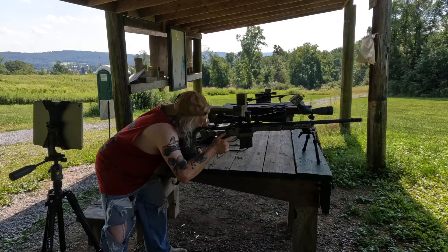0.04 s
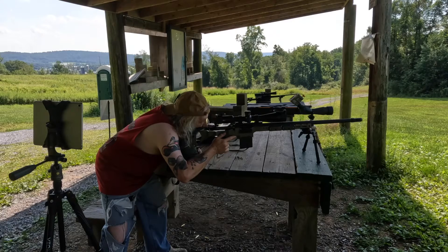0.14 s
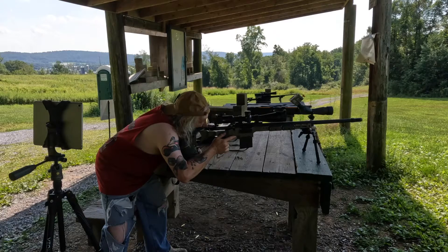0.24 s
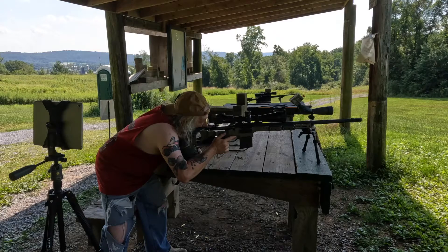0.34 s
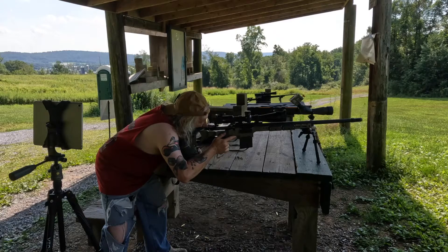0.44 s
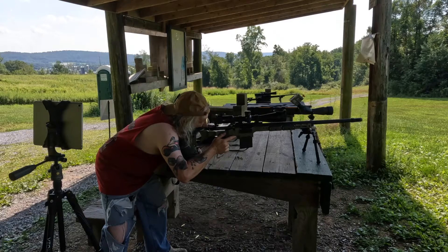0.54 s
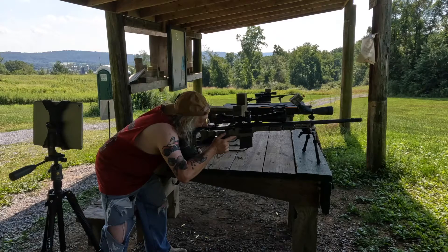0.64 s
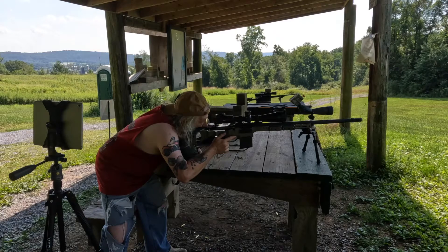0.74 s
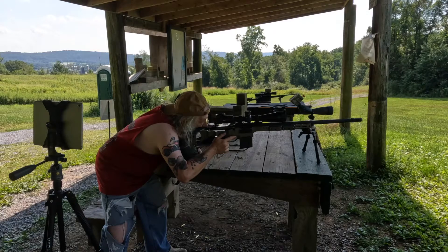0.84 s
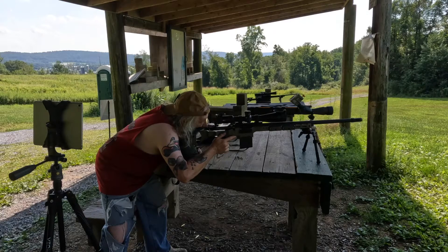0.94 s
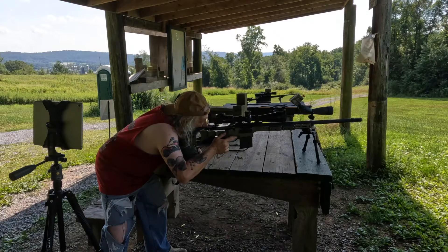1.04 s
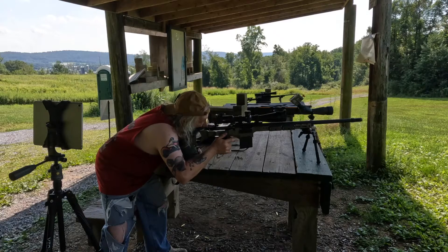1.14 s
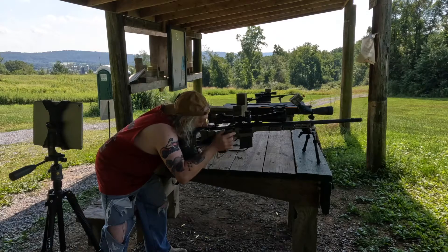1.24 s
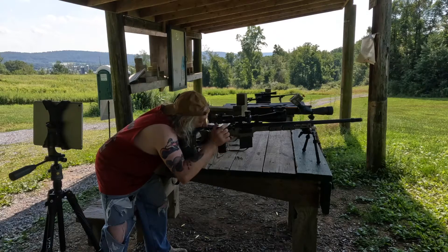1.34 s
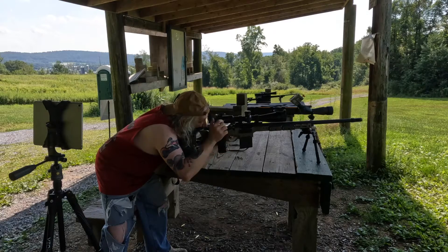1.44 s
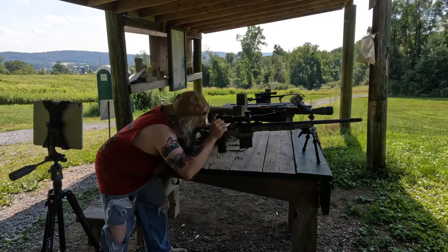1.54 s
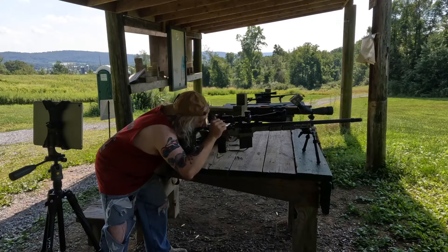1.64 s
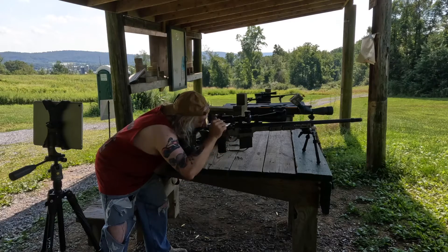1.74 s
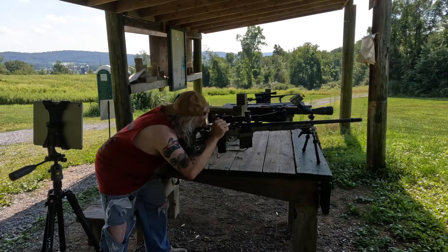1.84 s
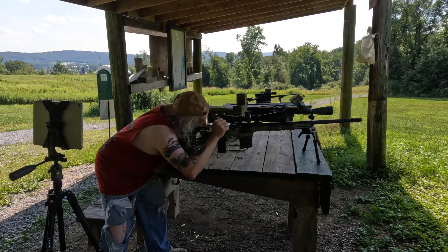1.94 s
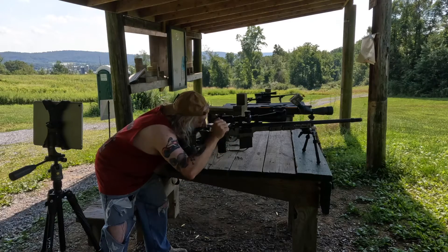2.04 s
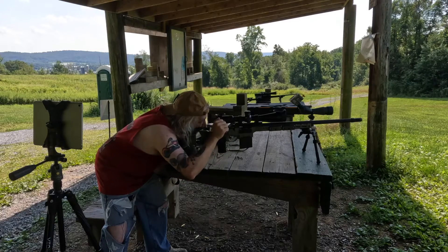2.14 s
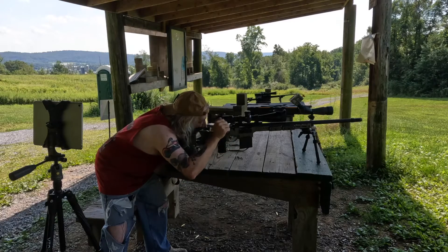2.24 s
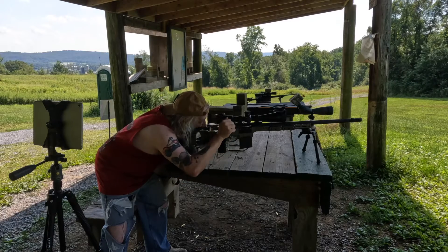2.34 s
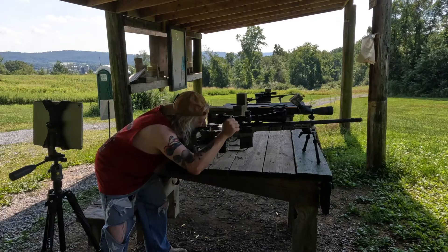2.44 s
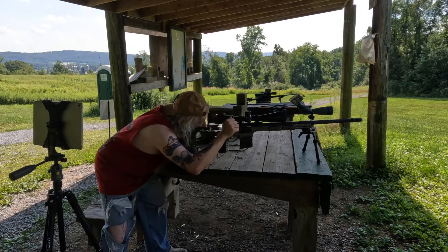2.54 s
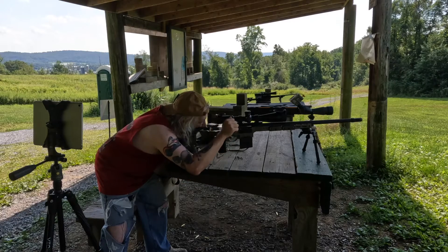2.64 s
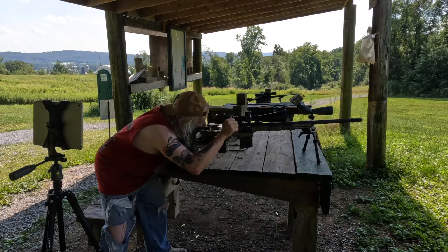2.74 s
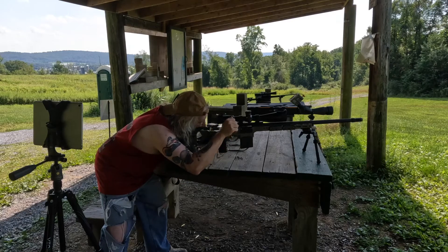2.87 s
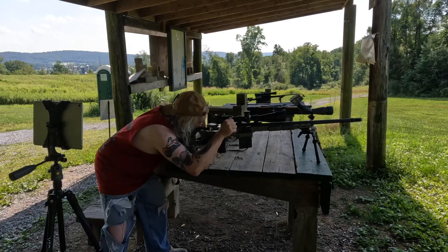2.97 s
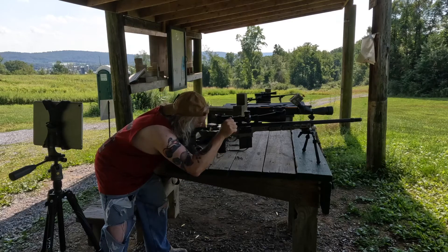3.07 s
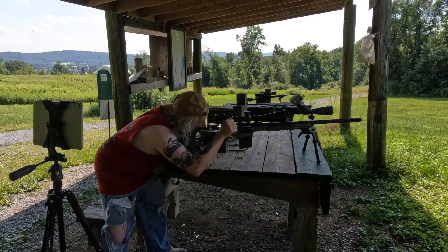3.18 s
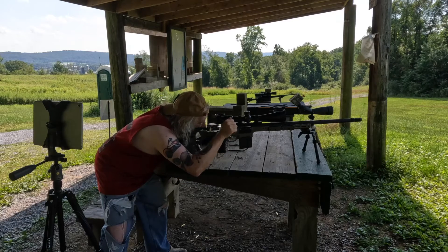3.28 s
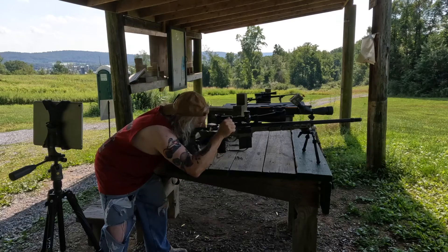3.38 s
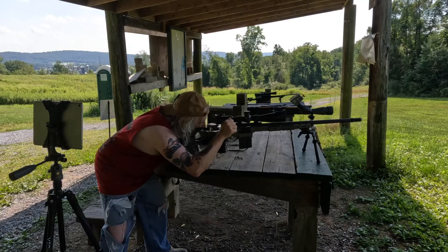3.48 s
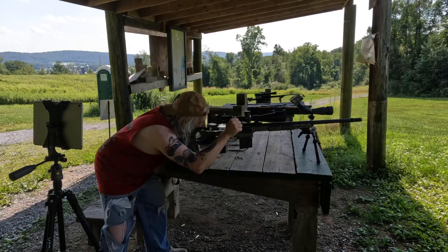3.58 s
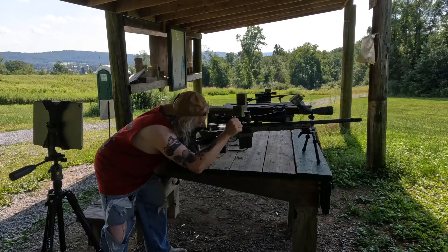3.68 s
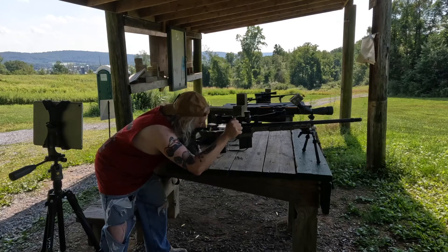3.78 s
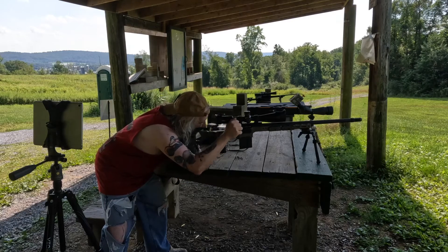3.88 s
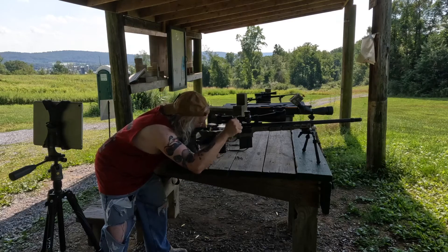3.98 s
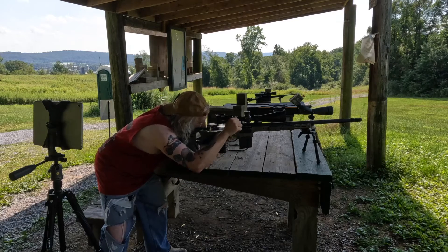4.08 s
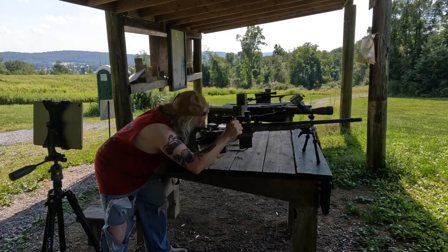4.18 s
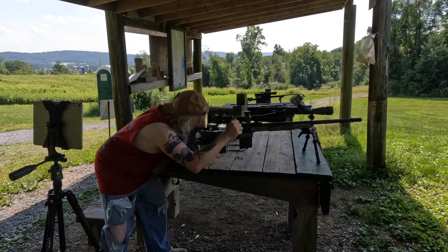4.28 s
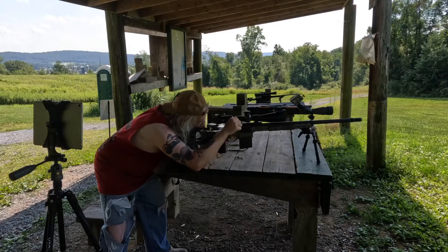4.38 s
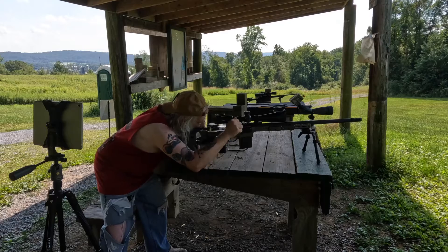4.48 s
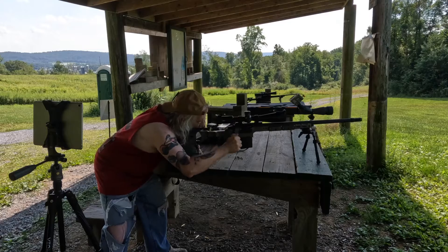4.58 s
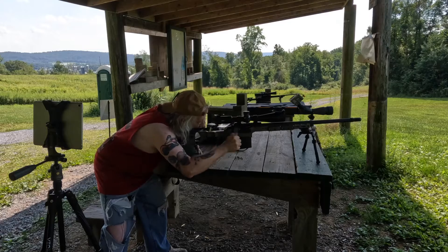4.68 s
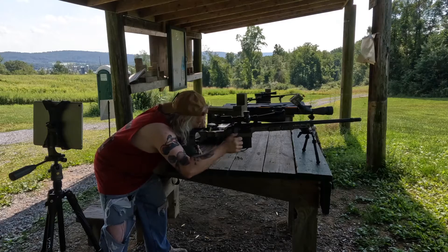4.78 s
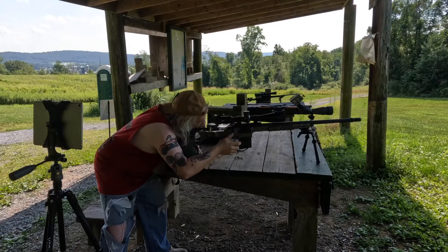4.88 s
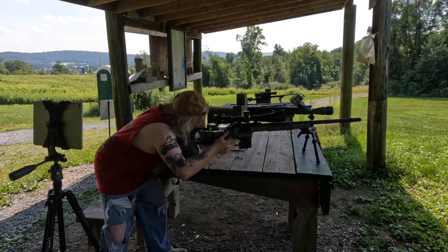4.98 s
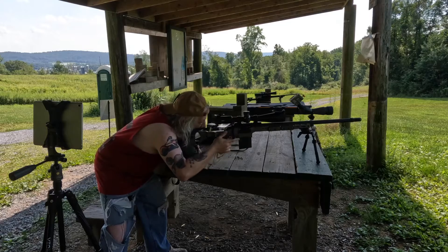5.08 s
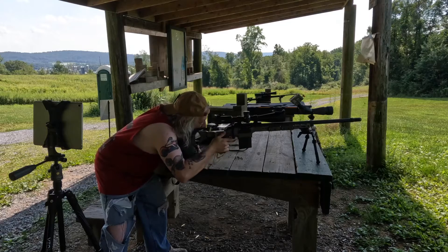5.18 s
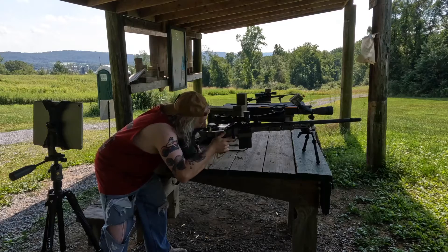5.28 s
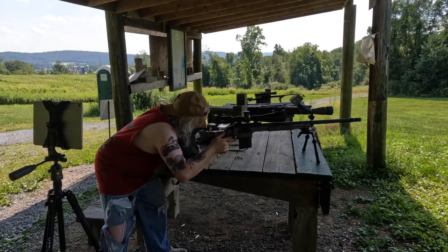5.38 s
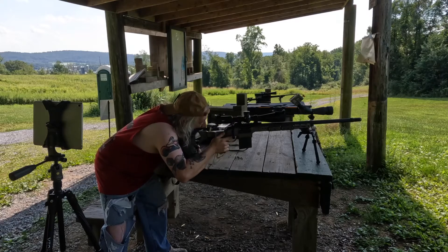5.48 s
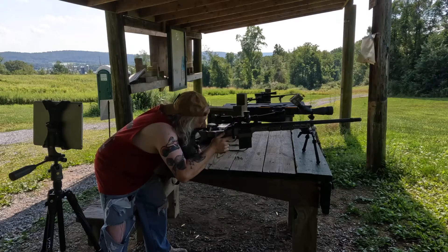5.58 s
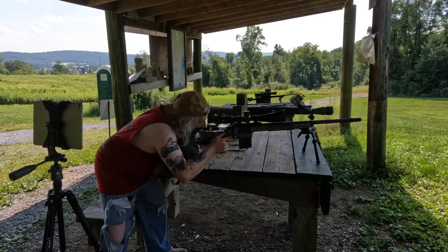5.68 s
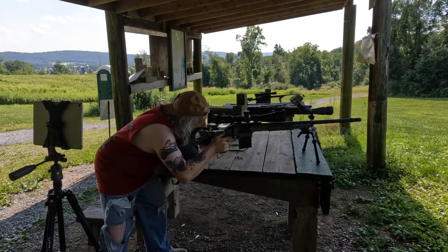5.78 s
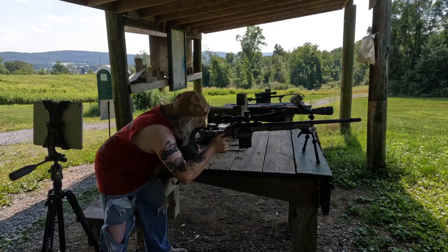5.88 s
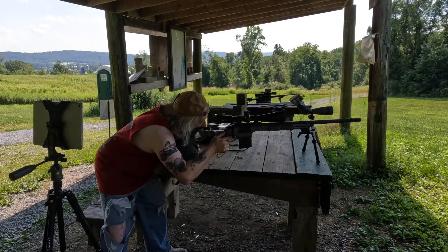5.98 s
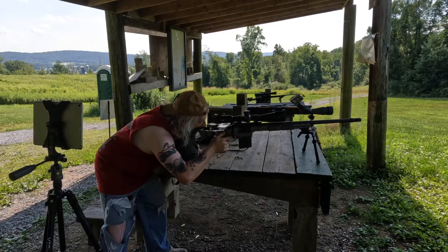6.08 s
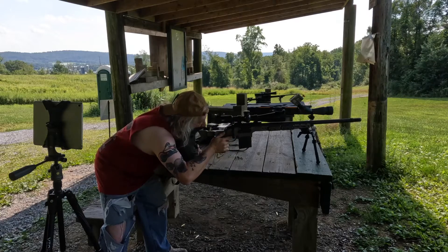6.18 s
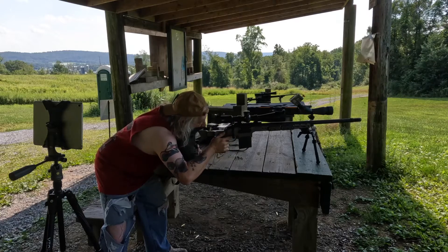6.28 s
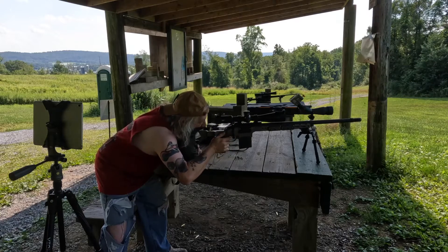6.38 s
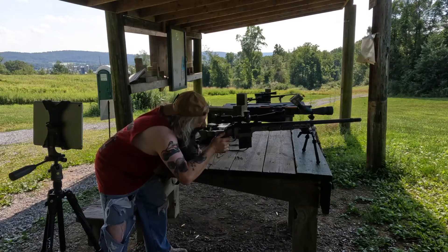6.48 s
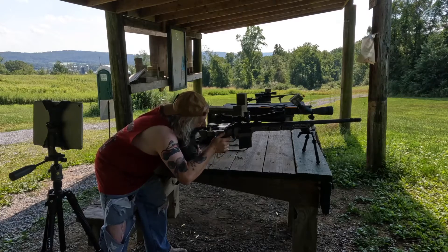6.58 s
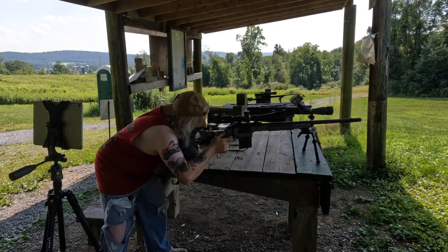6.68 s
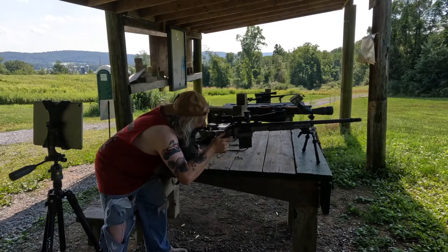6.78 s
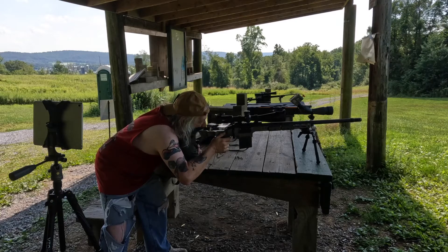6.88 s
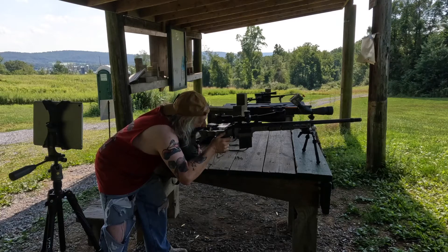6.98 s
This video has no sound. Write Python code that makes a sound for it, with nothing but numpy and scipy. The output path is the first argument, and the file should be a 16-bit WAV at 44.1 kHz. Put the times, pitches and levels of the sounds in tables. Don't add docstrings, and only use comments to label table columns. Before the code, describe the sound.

Under an open shelter, hard metallic bolt clacks and small finger ticks ring out over quiet outdoor hiss, with a far bird's falling whistles.

```python
import sys
import numpy as np
from scipy import signal
from scipy.fft import rfft, irfft
from scipy.io import wavfile
from scipy.ndimage import uniform_filter1d

SR = 44100
rng = np.random.default_rng(int(sys.argv[2]) if len(sys.argv) > 2 else 0)


def volts_from_decibels(level):
    exponent = np.asarray(level, float) / 20
    return 10 ** exponent


def file_out(sig):
    cols = np.atleast_2d(sig).T
    lim = np.clip(cols, -1, 1)
    pcm = np.round(lim * 32767).astype(np.int16)
    wavfile.write(sys.argv[1], SR, pcm)


N = 309582


def evened(x):
    return x / np.sqrt(np.mean(x ** 2) + 1e-20)


def peaked(x, db):
    return volts_from_decibels(db) * x / np.abs(x).max()


def read(points, hz):
    f, value = np.transpose(points)
    return np.interp(np.log(hz + 1), np.log(f + 1), value)


def add(mix, s, sound):
    part = mix[round(s * SR):][:len(sound)]
    part += sound[:len(part)]


def tinted(x, points, phase=0):
    hz = np.fft.rfftfreq(N, 1 / SR)
    return irfft(rfft(x) * volts_from_decibels(read(points, hz)) * np.exp(1j * phase), N)


def resonate(x, hz, width):
    turn = np.exp(2j * np.pi * np.cumsum(hz * np.ones(len(x))) / SR)
    r = np.exp(-np.pi * width / SR)
    return 2 * (turn * signal.lfilter([1 - r], [1, -r], x / turn)).real


def ring(t, hz, db, t60):
    return volts_from_decibels(db - 60 * t / t60) * np.sin(2 * np.pi * hz * t)


# f/Hz, level/dB per Hz
FIELDS = [(20, -30), (40, -13), (70, -3.5), (115, -6), (145, -6), (180, -1.5), (300, -8), (545, -6.5),
          (900, -11.5), (1290, -10.5), (4000, -18), (6750, -26), (7660, -20.5), (8400, -28.5), (8850, -33)]
# f/Hz, level/dB per Hz
FIZZ = [(9250, 6), (10300, 15), (11500, 12), (11900, -6), (13600, -20)]
# t/s, level/dB over the field noise
TRAFFIC = [(0, 3), (1.95, 0), (3.4, -1), (5.02, 1.5), (6.43, 7), (7.02, 6.5)]
# centre t/s, half width/s, level/dB
HANDLING = [
    (2.3, .25, 2),
    (3.68, 0.13, 4),
    (4.67, 0.26, 2),
]


def air():
    field_level_db, fizz_db = -53, -81
    frames, hz = N // 256 + 5, np.fft.rfftfreq(1024, 1 / SR)
    a, b, patches = rng.standard_normal((frames, 513, 3)).T
    patches = evened(uniform_filter1d(uniform_filter1d(patches, 10, 0), 10, 1))
    t = np.arange(frames) * 256 / SR - 512 / SR
    stir_db = sum(db * np.exp(-((t - s) / half) ** 2) for s, half, db in HANDLING)
    field_db = field_level_db + stir_db
    hum_db = np.interp(t, *np.transpose(TRAFFIC)) - 0.31 * stir_db
    hum = np.exp(-(np.log2((hz + 1) / 170) / 1.13) ** 2)[:, None]
    z = (a + 1j * b) * volts_from_decibels(0.89 * patches)
    gains = 0
    for points, db in [(FIELDS, field_db + hum * hum_db + 4.5), (FIZZ, fizz_db)]:
        inside = (hz >= points[0][0]) & (hz <= points[-1][0])
        shape = (volts_from_decibels(read(points, hz)) * inside)[:, None]
        gains = gains + shape / np.linalg.norm(shape) * volts_from_decibels(db)
    return volts_from_decibels(-1.15) * signal.istft(z * gains, nperseg=1024, noverlap=768)[1][:N]


# t/s, peak level/dB, f/Hz
BUMPS = [(0.17, -44, 146), (1.21, -50.5, 74), (1.679, -48.5, 107), (3.02, -48, 118), (4.489, -48, 180),
         (4.773, -46, 158)]


def wind():
    out = np.zeros(N)
    for s, db, hz in BUMPS:
        t = np.arange(round(3.9 / hz * SR)) / SR
        add(out, s, volts_from_decibels(db + 6) * np.sin(2 * np.pi * hz * t) * np.hanning(len(t)))
    return out


# f/Hz, level/dB, t60/s
ACTION = [(1364, 5, 0.086), (1750, -15, .04), (1900, -8, 0.021), (2200, -18, .04), (2430, -12, 0.043),
          (2790, 11, 0.019), (3180, -1, .04), (3470, -16, .04), (3950, 1, 0.058), (4340, 13, 0.018),
          (4810, 19, 0.038), (5200, -9, 0.012), (5770, 7, .03), (6430, 21, 0.061), (6910, 23, 0.038),
          (7330, -10, .03)]
# f/Hz, level/dB, t60/s
BARREL = (1110, 0, 0.11)
# f/Hz, level/dB, t60/s
TWIN = (1165, -9.5, 0.07)
# f/Hz, width/Hz, level/dB
EDGE = [(9600, 250, -4), (10870, 1100, 4.5), (12800, 990, -22)]


def contact(db, hz, chatter, barrel_db, edge_db):
    t, chance = np.arange(6000) / SR, rng.standard_normal((2, 6000))
    u = t / np.clip(chatter, 3e-4, .03)
    burst = np.exp(-u) * (1 - np.exp(-3 * u))
    rattle = 0.033 * np.exp(-t / 0.018) * (1 - np.exp(-u))
    blows = chance[0] * (abs(chance[1]) > 1.1) * (burst + rattle)
    crack = resonate(resonate(blows, hz, 0.47 * hz), hz, 0.47 * hz)
    crack = crack + 0.47 * resonate(resonate(blows, 4400, 8300), 4500, 8300)

    detune = 1 + 0.041 * chance[0, -2 * len(ACTION):]
    modes = 0
    for (f, level, t60), d in zip(ACTION + ACTION, detune):
        modes = modes + ring(t, f * d, level - 6 * np.log2(f / hz) ** 2, t60)
    steel = peaked(crack, 0) + peaked(signal.fftconvolve(blows, modes)[:len(t)], -16)
    no_bass = signal.butter(3, 1000, "high", fs=SR, output="sos")
    steel = signal.sosfilt(no_bass, steel)

    side_struck = np.sign(chance[0, 0])
    barrel = side_struck * (ring(t, *BARREL) + ring(t, *TWIN)) * (1 - np.exp(-t / 0.0014))
    edge = sum(volts_from_decibels(level) * resonate(resonate(blows, f, w), f, w) for f, w, level in EDGE)
    return peaked(steel, db) + peaked(barrel, db + barrel_db) + peaked(edge, db + edge_db + 14.0)


# t/s, peak level/dB, contact f/Hz
TICKS = [(1.388, -43.5, 3400), (1.46, -44, 2700), (2.1816, -34, 1500), (2.344, -37.5, 2500),
         (2.724, -39, 1710), (3.0756, -45, 3190), (3.102, -38.5, 2430), (3.2435, -49, 2310),
         (3.39, -44, 3450), (3.891, -41, 2980), (3.9082, -35.5, 4640), (4.1623, -33, 3800),
         (4.2737, -38, 3340), (4.2933, -33.5, 4450), (4.5086, -33, 2440), (4.6149, -40, 3830),
         (4.652, -31, 3210), (4.9169, -40, 1700), (5.8382, -55, 1550)]


def ticks():
    out = np.zeros(N)
    for s, db, hz in TICKS:
        add(out, s, contact(db, hz, chatter=0.0039, barrel_db=-23, edge_db=-34))
    return out


# t/s, peak level/dB, contact f/Hz, barrel level/dB
CLACKS = [(1.915, -13.5, 5370, -47), (2.4377, -31, 2200, -5), (2.4573, -8.5, 2790, -37),
          (2.4661, -18, 3780, -7), (2.4705, -0.5, 2840, -22), (2.5313, -10.5, 4790, -18.5),
          (2.5378, -11.5, 2430, -22), (3.494, -32.5, 3080, -23), (3.5358, -21.5, 2400, -10),
          (3.5997, -24, 2400, -13.5), (4.1672, -21.5, 3000, -17), (4.523, -12.5, 3550, -17.5),
          (4.527, -19, 4200, -40), (3.633, -20, 3120, -14), (4.676, -15, 4200, -26)]


def clacks():
    out = np.zeros(N)
    for s, db, hz, barrel_db in CLACKS:
        add(out, s, contact(db, hz, 0.0024, barrel_db, edge_db=-38))
    return out


# t/s, peak level/dB, f/Hz, t60/s, rise/s
RINGS = [(1.916, -16.5, 5200, 0.038, 0.00073), (1.918, -37, 1210, 0.12, 0.0011),
         (1.918, -43, 3930, .08, .002), (1.985, -26.5, 1248, 0.036, 0.0014),
         (1.982, -54, 2180, 0.033, 0.0022), (2.439, -12, 2190, 0.033, 0.0051),
         (2.4823, -5, 1160, 0.05, 0.00057), (2.536, -16, 2430, 0.022, 0.0018),
         (2.56, -32, 2576, 0.11, 0.0028), (3.7, -17, 2294, 0.04, 0.0018), (3.7, -26, 1410, 0.046, 0.00075),
         (4.17, -32, 1370, 0.033, .001), (4.738, -38, 2880, 0.12, 0.005), (4.735, -16, 1087, 0.029, 0.0019),
         (4.757, -32, 1074, 0.049, 0.0033), (5.785, -40, 1620, 0.047, 0.0043),
         (5.855, -47.5, 1980, 0.091, .004)]


def rings():
    out, t = np.zeros(N), np.arange(9000) / SR
    for s, db, hz, t60, rise in RINGS:
        add(out, s, ring(t, hz, db, t60) * (1 - np.exp(-t / rise)))
    return out


# t/s, peak level/dB, contact f/Hz, barrel level/dB
SNAPS = [(1.979, -17, 2190, -31), (2.4761, -9, 4300, -16), (2.4822, 2, 3260, -33), (2.4865, -3, 4230, -23),
         (3.0852, -36, 2320, -18), (3.6484, -23.5, 3170, -3), (3.6683, -15.5, 4820, -18),
         (3.6966, 4, 4500, -30.5), (4.6801, -7, 4100, -31), (4.7315, -0.5, 3430, -41),
         (4.7374, -16.5, 3850, -13), (6.3035, -35.5, 5000, -34)]


def snaps():
    out = np.zeros(N)
    for s, db, hz, barrel_db in SNAPS:
        add(out, s, contact(db, hz, 0.0018, barrel_db, edge_db=-25.5))
    return out


def slide(plan, width):
    s, *columns = np.transpose(plan)
    t = np.arange(s[0], s[-1], 1 / SR)
    db, hz = (np.interp(t, s, c) for c in columns)
    slips = rng.standard_normal(len(t)) * volts_from_decibels(2.5 * np.minimum(rng.exponential(1, len(t)), 4))
    rub = evened(resonate(slips, hz, width)) + 0.048 * evened(slips)
    return volts_from_decibels(db) * rub * signal.windows.tukey(len(t), .1)


# f/Hz, width/Hz, level/dB
SQUEAL = [(6080, 70, -58.5), (5790, 70, -58.5), (5410, 90, -58), (4450, 70, -63), (7100, 100, -59)]


def draw():
    out = np.zeros(N)
    start, length, rise, sag = 2.0, 0.44, 0.12, 0.81
    end = start + length
    for hz, width, db in SQUEAL:
        plan = [(start, db - 1, .97 * hz),
                (start + rise, db, hz),
                (end - .16, db - 3.0, .975 * hz),
                (end - .07, db - 4.0, .99 * hz),
                (end, db - 5, sag * hz)]
        add(out, start, slide(plan, width))
    return out


# t/s, length/s, level/dB, f/Hz
SCRAPES = [
    (2.432, 0.042, -34, 2700),
    (3.63, .068, -34.5, 3400),
    (4.602, 0.08, -50.5, 3400),
]


def scrapes():
    out = np.zeros(N)
    for s, length, db, hz in SCRAPES:
        plan = [(s, db - 10, hz), (s + 0.32 * length, db, hz), (s + length, db - 14, hz)]
        add(out, s, slide(plan, width=2900))
    return out


# t/s, hold/s, level/dB, f/Hz, t60/s
RATTLES = [
    (2.457, 0.025, -19.5, 4200, .04),
    (2.529, 0.01, -28, 4000, 0.13),
    (3.697, 0.0053, -18, 4500, 0.091),
    (4.154, .001, -36, 4570, 0.09),
    (4.519, 0.0032, -37, 3580, 0.046),
    (4.678, .006, -30, 4000, 0.094),
    (4.732, 0.00092, -17, 4450, 0.015),
]


def rattles():
    out = np.zeros(N)
    settle_s, settle_db, settle_sag = 0.098, -13, 0.43
    for s, hold, db, hz, t60 in RATTLES:
        knee, knee_db = s + hold + t60 / 3, db - 25.5
        plan = [(s, db, hz),
                (s + hold, db, hz),
                (knee, knee_db, hz),
                (knee + settle_s, knee_db + settle_db, settle_sag * hz)]
        add(out, s, slide(plan, width=3300))
    return out


# t/s, peak level/dB, f/Hz, t60/s
KNOCKS = [(2.46, -26.5, 697, 0.15), (2.483, -20, 682, 0.13), (2.54, -54, 725, 0.092),
          (3.65, -34.5, 644, 0.13), (3.698, -26.5, 815, 0.045), (3.73, -31.5, 624, 0.11),
          (4.525, -30, 620, 0.024), (4.733, -25, 822, 0.052), (4.735, -29, 446, 0.055),
          (4.74, -24, 243, 0.069), (3.7, -29.5, 483, 0.033), (3.705, -34, 252, 0.071),
          (4.76, -30.5, 616, 0.1), (5.86, -40.5, 519, 0.16), (5.849, -48, 1036, .06)]


def knocks():
    out, t = np.zeros(N), np.arange(9000) / SR
    for s, db, hz, t60 in KNOCKS:
        wood = ring(t, hz, db, t60) + ring(t, 0.862 * hz, db - 2.5, t60 / 2)
        add(out, s, wood * (1 - np.exp(-t / 0.0003)))
    return out


def rifle():
    steel = ticks() + clacks() + rings() + snaps()
    return steel + draw() + scrapes() + rattles() + knocks()


# f/Hz, t60/s
ROOF = [(300, 0.56), (1000, 0.23), (3000, 0.2), (7000, 0.14), (10000, 0.18), (14000, 0.17)]


def tail():
    taps = np.zeros(SR // 2)
    at = np.arange(120, len(taps) - 12, 12)
    taps[at + rng.integers(0, 12, len(at))] = rng.choice([-1., 1.], len(at))
    hz, t, z = signal.stft(taps, SR, nperseg=256)
    z = z * volts_from_decibels(-60 * t / read(ROOF, hz)[:, None])
    out = signal.istft(z, SR, nperseg=256)[1][:len(taps)]
    return out / np.linalg.norm(out)


# delay t/s, level/dB
EARLY = [(.0028, -15.5), (.0051, -16.5), (.0085, -39), (.012, -19), (.017, -19), (.024, -31)]


def shelter(x):
    early = np.zeros(SR // 20)
    for k, (s, db) in enumerate(EARLY):
        early[round(s * SR)] = (-1) ** k * volts_from_decibels(db)
    turn = 2 * np.pi * 9 * np.arange(N) / SR
    late = 0
    for k in range(3):
        share = np.sqrt(2 / 3) * np.cos(turn + k * np.pi / 3)
        late = late + signal.fftconvolve(x * share, tail())[:N]
    return x + signal.oaconvolve(x, early)[:N] + volts_from_decibels(-6.5) * late


# t/s, length/s, start f/Hz, level/dB
SLURS = [
    (2.779, 0.36, 3670, -63.5),
    (3.277, 0.22, 3990, -59.5),
    (3.681, 0.28, 3880, -55),
]
# t/s, length/s, start f/Hz, level/dB
HELD = [(4.039, 0.16, 3870, -56.5), (4.355, 0.13, 3830, -57), (4.569, 0.11, 3880, -54),
        (4.76, 0.096, 3950, -64)]
# t/s, start f/Hz, level/dB
TRILL = [(4.925, 3950, -51), (5.07, 3910, -53), (5.203, 3860, -53.5), (5.31, 3880, -54), (5.425, 3890, -50),
         (5.535, 4030, -51.5), (5.653, 3880, -51.5), (5.775, 3960, -49.5)]


def song():
    slurs = [(*row, 0.1) for row in SLURS]
    held = [(*row, .45) for row in HELD]
    trill = [(s, .085 * 0.9 ** k, hz, db, .36) for k, (s, hz, db) in enumerate(TRILL)]
    return slurs + held + trill


def sparrow():
    out, low_hz = np.zeros(N), 2890
    for s, length, hz0, db, held in song():
        u = np.linspace(0, 1, round(length * SR))
        fall = 0.0914 * u + 0.97 * np.clip((u - held) / (1 - held), 0, 1) ** 0.92
        tone = np.sin(2 * np.pi * np.cumsum(hz0 + (low_hz - hz0) * fall) / SR)
        add(out, s, volts_from_decibels(db - 1.5 - 5.6 * fall) * tone * signal.windows.tukey(len(u), .3))
    t = np.arange(4000) / SR
    echo = volts_from_decibels(-28.5 - 60 * t / 0.3) * rng.standard_normal(len(t))
    echo[[0, round(.025 * SR)]] = 1, volts_from_decibels(-2.5)
    flutter = volts_from_decibels(2.0 * evened(uniform_filter1d(rng.standard_normal(N), 500)))
    return flutter * signal.oaconvolve(out, echo)[:N]


# f/Hz, level/dB
MIC = [(150, -21), (450, -6.5), (1000, 0), (3000, 5), (6000, -4), (8000, -9.5), (9050, -20.5),
       (9700, -13.5), (14000, -24.5), (15500, -40), (16300, -70)]
# f/Hz, side minus mid level/dB
WIDTH = [(60, -30), (150, -39), (400, -32.5), (1200, -41.5), (4000, -34.5), (9000, -28), (11200, -20),
         (11800, -8), (14000, -2)]


def scene():
    mono = air() + wind() + tinted(shelter(rifle()), MIC) + sparrow()
    side = tinted(np.roll(mono, 40), WIDTH, np.pi / 2)
    return np.array([mono + side, mono - side])


def roll_off(x):
    return signal.sosfilt(signal.butter(12, 16460, fs=SR, output="sos"), x)


def record(dry):
    power_db = 10 * np.log10(abs(uniform_filter1d((dry ** 2).mean(0), 800)) + 1e-12)
    fall = np.arange(N) * 19.0 / SR
    over_db = np.maximum(np.maximum.accumulate(power_db + fall) - fall + 31.0, 0)
    ducked = dry / volts_from_decibels(0.1 * uniform_filter1d(over_db, 300, origin=140))
    held = ducked / (1 + ducked ** 4) ** (1 / 4)
    low_pass = signal.butter(10, 15800, fs=SR, output="sos")
    return roll_off(signal.sosfilt(low_pass, held))


dry = scene()
out = record(dry)
file_out(out)
```